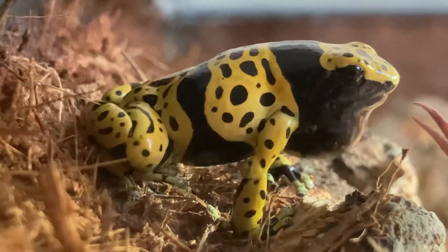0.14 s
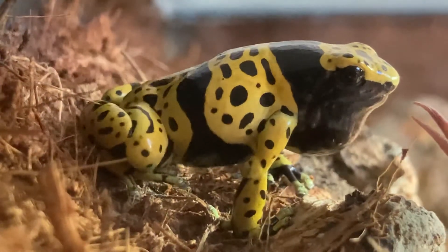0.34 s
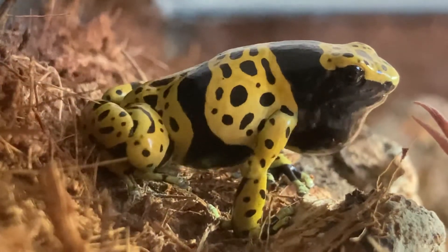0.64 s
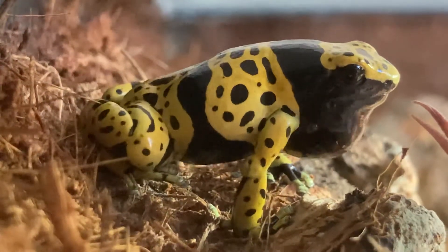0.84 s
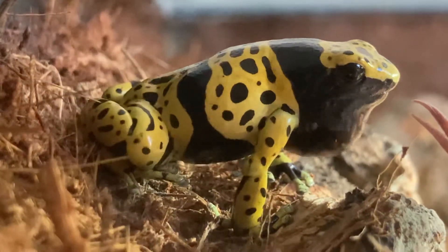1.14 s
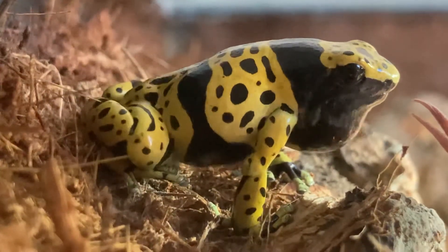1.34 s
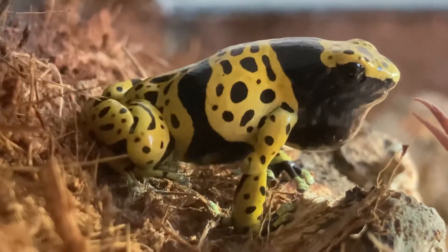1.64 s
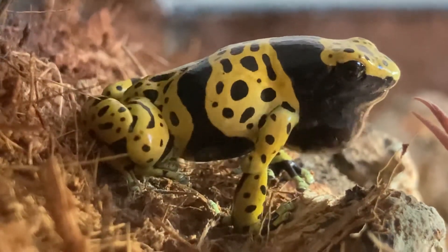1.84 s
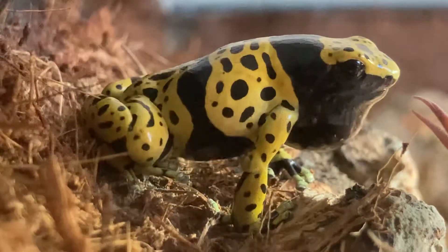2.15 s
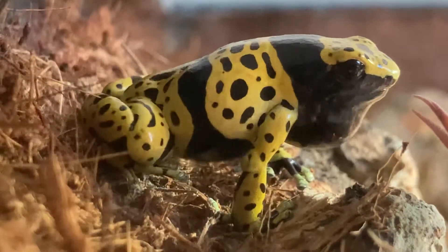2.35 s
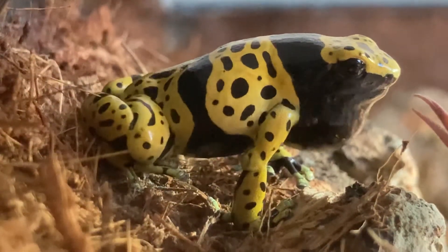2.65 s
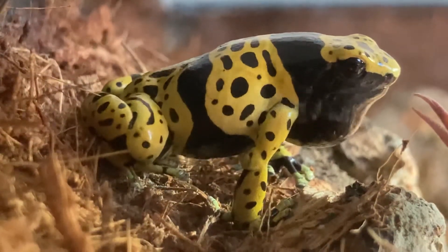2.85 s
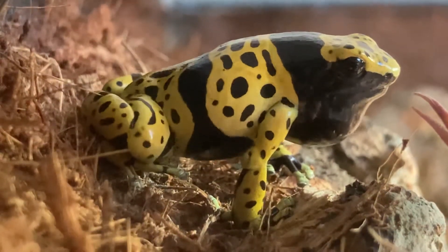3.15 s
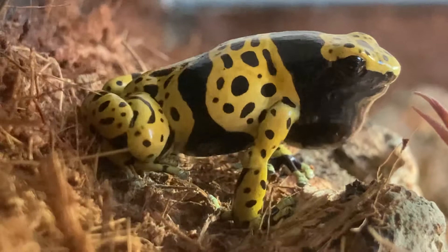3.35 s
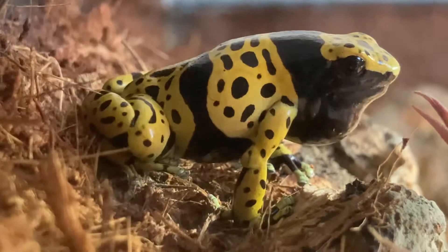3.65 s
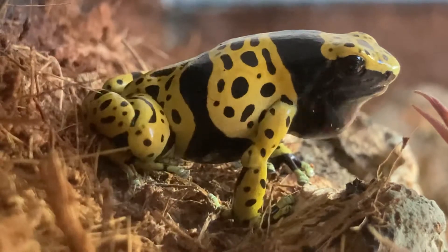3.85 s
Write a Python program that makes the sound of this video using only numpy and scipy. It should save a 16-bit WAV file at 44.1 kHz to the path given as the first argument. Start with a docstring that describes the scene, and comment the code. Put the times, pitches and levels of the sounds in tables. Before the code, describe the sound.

A small frog trills from the start, close and to the left, about thirteen high, raspy chirps a second, ringing lightly in a glass tank and the room. Two faint, dull knocks fall in the first 0.3 seconds, with a very brief dropout between them. The trill holds steady, falters near 3.4 seconds and gives a last note at 3.5. A faint rumble and soft bumps lie underneath.

```python
"""A small poison frog is trilling, about 13 notes a second, in a glass tank near the left microphone.
Each note is one quick upward sweep of a harmonic voice; it flashes out as its second harmonic
crosses the resonance of the throat. The glass reflects it, and the tank and the room ring on,
over a faint rumble and hiss, two knocks, soft bumps and a few ticks. Early on, the level dips briefly."""
import sys
import numpy as np
from scipy import signal
from scipy.fft import rfft, irfft
from scipy.io import wavfile
from scipy.ndimage import uniform_filter1d

SR = 44100
rng = np.random.default_rng(int(sys.argv[2]) if len(sys.argv) > 2 else 0)


def transcribe(u):
    """Save the signal u as a 16-bit wav file named by the first command-line argument.

    u: samples, shape (n,) or (channels, n), limited to [-1, 1]; the rate is SR.
    q: integer samples, one column per channel.
    """
    v = np.clip(np.atleast_2d(u).T, -1, 1)
    q = np.round(v * 32767).astype(np.int16)
    wavfile.write(sys.argv[1], SR, q)


N = 176400


def amp(db):
    """The decibel law: amplitude grows tenfold every 20 dB."""
    return 10 ** (np.asarray(db) / 20)


def unit_rms(x):
    """Normalisation to unit mean power."""
    return x / np.sqrt(np.mean(x ** 2) + 1e-20)


def spectrum_at(table, hz):
    """Interpolation on log frequency; the frequency column alone is first put in rising order."""
    f, *columns = np.transpose(table)
    return np.array([np.interp(np.log(hz + 1), np.log(np.sort(f) + 1), c) for c in columns])


def add(mix, start_s, sound):
    """Superposition: a sound adds to the mix from start_s on."""
    part = mix[max(round(start_s * SR), 0):][:len(sound)]
    part += sound[:len(part)]


def through(x, responses):
    """Linear filtering: convolution with one impulse response per channel."""
    return signal.fftconvolve(x[None], responses, axes=1)[:, :len(x)]


def band_noise(hz, octaves, count):
    """Spectral shaping: white noise under a Gaussian band on log frequency."""
    f = np.fft.rfftfreq(count, 1 / SR) + 1
    band = np.exp(-.5 * (np.log2(f / hz) / octaves) ** 2)
    return unit_rms(irfft(rfft(rng.standard_normal(count)) * band, count))


def note(db):
    """Periodic vibration of the vocal folds: a rising harmonic series, raspy until it settles."""
    peak_hz, peak_s, settle_s = 1377.7, .024, .018
    attack_s, hold_s, release_s = .023, .0071, .0046
    t = np.arange(0, attack_s + hold_s + release_s, 1 / SR)
    wander, air = rng.standard_normal((2, SR // 10))[:, :len(t)]
    unsettled = np.clip(1 - t / settle_s, 0, 1)
    jitter = (.0067 + .12 * unsettled) * unit_rms(uniform_filter1d(wander, size=40))
    octaves_per_s = 36 * (1 + .041 * rng.standard_normal())
    pitch_hz = peak_hz * 2 ** (octaves_per_s * (t - peak_s)) * (1 + jitter)
    phase = 2 * np.pi * np.cumsum(pitch_hz) / SR
    fundamental_db = -7.5 * (1 - np.minimum(t / peak_s, 1) ** 2)  # fills in as the note settles
    folds = amp(fundamental_db) * np.cos(phase) + sum(np.cos(k * phase) for k in range(2, 10))
    rasp = (amp(-14) + unsettled) * np.sqrt(10) * air
    attack = np.minimum(t / attack_s, 1) ** 1.325
    release = np.clip((t[-1] - t) / release_s, 0, 1)
    return amp(db) * attack * release * (folds + rasp)


def trill(run_up_s=.25):
    """A nearly periodic pulse train of notes, beginning run_up_s ahead of time zero."""
    # notes at their loudest moment: t/s, source level/dB
    notes = [(0.0713, -1), (0.173, -1.3), (0.2242, -1.8), (0.3018, -1.2), (0.3777, -1.2), (0.4546, -1.4),
             (0.5341, -1.5), (0.6107, -1.5), (0.687, -2.3), (0.7646, -1.5), (0.8424, -1.8), (0.9197, -1.8),
             (0.996, -1.6), (1.0739, -1.5), (1.1514, -1.5), (1.2306, -1.7), (1.3077, -1.5), (1.3856, -1.6),
             (1.4632, -1.5), (1.5421, -2), (1.6167, -2.1), (1.6931, -1.5), (1.7742, -2.9), (1.851, -1.4),
             (1.9302, -0.9), (2.0066, -1.9), (2.0836, -1.8), (2.1621, -1.6), (2.2416, -2), (2.3185, -1.9),
             (2.398, -2), (2.4761, -1.6), (2.5557, -1.8), (2.6355, -2.6), (2.7123, -2.2), (2.7907, -1.8),
             (2.8726, -2), (2.9522, -2.2), (3.032, -2), (3.112, -2), (3.191, -2), (3.2695, -2.1),
             (3.3493, -2.9), (3.4889, -2.34)]
    # notes before time zero, whose ringing carries over: t/s
    earlier_notes = [-0.2, -0.07, -0.016]
    lead_s = .024 + .0009  # rise to the peak, plus the lag of the resonance
    voice = np.zeros(N + round(run_up_s * SR))
    for s, db in [(s, notes[0][1]) for s in earlier_notes] + list(notes):
        add(voice, run_up_s + s - lead_s, note(db))
    add(voice, run_up_s + 3.408, note(db=-1)[:round(.0175 * SR)])  # breaks off before its peak
    return voice


def throat_and_glass(voice, size=4096):
    """Source and filter: resonances colour the voice, and reflections interfere with the direct sound."""
    # throat and tank response at each microphone: f/Hz, left level/dB, right level/dB
    resonances = [(700, -60.5, -66), (1130, -56, -60.5), (1360, -60, -65), (1453, -52, -37.5),
                  (1436, -43, -41), (1652, -30.5, -47.5), (1863, -28.5, -45), (1954, -46.5, -52),
                  (2222, -24.5, -39), (2496, -37.5, -43.5), (2568, -22.5, -41), (2742, -13, -40),
                  (2876.6, -17.5, -33.5), (2946, -43.5, -40.5), (3080, -34.5, -49), (3650, -37.5, -65),
                  (4084, -65, -60), (4204, -40.5, -55.5), (4385, -70.5, -66.5), (4590, -55, -55.5),
                  (5230, -71.5, -77), (5614, -63, -53.5), (6400, -83.5, -75), (7000, -83.5, -72),
                  (6590, -63, -62), (7200, -66, -67.5), (8210, -71, -71), (8560, -105, -105)]
    # reflections off the glass: delay t/s, left level/dB, right level/dB
    walls = [(.0034, -29.5, -7), (.0066, -38.5, -5), (.0098, -29.5, -17), (0.0148, -27.5, -31)]
    log_gain = np.log(amp(spectrum_at(resonances, abs(np.fft.fftfreq(size, 1 / SR)))))
    minimum_phase = np.exp(signal.hilbert(log_gain).conj())
    direct = np.fft.ifft(minimum_phase).real[:, :size // 2]
    hz = np.fft.rfftfreq(size, 1 / SR)
    comb = 1 + sum(amp([[left], [right]]) * np.exp(-2j * np.pi * hz * s) for s, left, right in walls)
    return through(voice, irfft(rfft(direct, size) * comb))


def diffuse_tail(x, bands, build_s, size=512):
    """Reverberation: dense reflections act as noise that builds up, then decays exponentially by band."""
    hz, t, noise = signal.stft(rng.standard_normal((2, SR)), SR, nperseg=size)
    left, right, t60 = spectrum_at(bands, hz)[:, :, None]
    unit_energy = np.sqrt(2 * np.log(1000) / (t60 * SR))
    fade = amp(np.array([left, right]) - 60 * t / t60) * unit_energy
    tail = signal.istft(noise * fade, SR, nperseg=size)[1]
    build = 1 - np.exp(-(np.arange(tail.shape[1]) / SR / build_s) ** 2)
    return through(x, tail * build)


def tank_modes(voice):
    """Normal modes: each note excites narrow resonances of the enclosure, which ring as damped sines."""
    # modes: f/Hz, left level at resonance/dB, decay t60/s
    modes = [(1580, -41.5, 0.47), (2260, -43.5, .5), (2770, -28.5, 0.36)]
    t = np.arange(SR) / SR
    response = np.zeros(SR)
    for hz, db, t60 in modes:
        unit_gain = 2 * np.log(1000) / (t60 * SR)
        response += amp(db - 60 * t / t60) * unit_gain * np.sin(2 * np.pi * hz * t)
    return through(voice, response * amp([[0], [-5.5]]))  # weaker on the right


def tank_wash(voice):
    """Reverberation in a small enclosure: a short wash inside the tank."""
    # tank reverberation: f/Hz, left level/dB, right level/dB, decay t60/s
    bands = [(800, -74, -75.5, 0.048), (1190, -57.5, -62.5, 0.026), (1610, -46, -52.5, 0.15),
             (2630, -48, -36, 0.036), (3700, -58, -45, 0.076), (5500, -59.5, -71.5, 0.05),
             (8100, -81.5, -87, 0.1), (8700, -105, -105, .05)]
    return diffuse_tail(voice, bands, build_s=.0015)


def room_ring(voice):
    """Reverberation in a larger enclosure: the room builds more slowly and rings longer."""
    # room reverberation: f/Hz, left level/dB, right level/dB, decay t60/s
    bands = [(756, -62, -69.5, .6), (1267, -57.5, -58, 0.36), (1612, -38, -39.5, 0.82),
             (1865, -40, -51, 0.51), (2200, -35.5, -38, 0.53), (2615, -38.5, -40, 1),
             (2760, -28, -33.5, 0.87), (3040, -49, -47.5, 0.35), (3080, -45.5, -49, .55),
             (3750, -62, -61.5, 0.48), (5500, -69, -73, 0.32), (8100, -80, -77.5, 0.49),
             (8700, -110, -110, .3)]
    return diffuse_tail(voice, bands, build_s=.015)


def rumble(size=2048):
    """Partial coherence: room noise swells in patches, alike in both channels at low frequencies."""
    # spectral density of the rumble: f/Hz, relative level/dB
    density = [(15, -18), (35, -1), (62, 0.2), (120, -9), (250, -15), (500, -20), (900, -26), (1900, -31),
               (2900, -25), (3700, -45), (8100, -48), (8900, -58)]
    # likeness of left and right: f/Hz, coherence (0 to 1)
    likeness = [(30, 1), (90, 0.99), (180, .9), (350, 0.85), (700, 0.1), (3000, 0.12)]
    patch_db, swell_db, hop = 2.5, .87, size // 4
    frames, hz = N // hop + 5, np.fft.rfftfreq(size, 1 / SR)
    left_re, left_im, other_re, other_im, patches = rng.standard_normal((frames, len(hz), 5)).T
    patches = uniform_filter1d(patches, size=8, axis=0)  # smooth over frequency, then over time
    patches = unit_rms(uniform_filter1d(patches, size=5, axis=1))
    swell = unit_rms(uniform_filter1d(rng.standard_normal(frames), size=6))
    coherence = np.clip(spectrum_at(likeness, hz).T, -1, 1)
    left = left_re + 1j * left_im
    right = coherence * left + np.sqrt(1 - coherence ** 2) * (other_re + 1j * other_im)
    gain = amp(spectrum_at(density, hz).T + patch_db * patches + swell_db * swell)
    noise = signal.istft(np.array([left, right]) * gain, nperseg=size, noverlap=size - hop)[1]
    return amp(-64) * unit_rms(noise[:, :N])


def hiss(hz=11300, width_hz=1200, db=-92):
    """Incoherent noise: a thin high band, independent in each channel."""
    octaves = width_hz / hz / np.log(2)
    return amp(db) * np.array([band_noise(hz, octaves, N) for _ in range(2)])


def knocks():
    """Damped oscillation: gritty thuds whose pitch drops as they die."""
    # knocks: onset t/s, level/dB
    events = [(0.02, -46), (0.294, -44)]
    top_hz, end_hz = 772, 72.5
    drop_s, rise_s, fade_s = .007, .0099, .013
    out, t = np.zeros(N), np.arange(SR // 4) / SR
    for s, db in events:
        hz = end_hz + (top_hz - end_hz) * np.exp(-t / drop_s)
        tone = np.sin(2 * np.pi * np.cumsum(hz) / SR)
        grit = .63 * band_noise(hz=150, octaves=1, count=len(t))
        envelope = np.minimum(t / rise_s, 1) * np.exp(-t / fade_s)
        add(out, s, amp(db) * envelope * (tone + grit))
    return out


def bumps():
    """Amplitude modulation: low noise under a rounded envelope is heard as a soft, dull bump."""
    # bumps: t/s (just past the peak), level/dB, centre f/Hz, length t/s
    events = [(.2, -61.5, 170, .03), (0.529, -58, 140, 0.037), (0.593, -56.5, 170, 0.088),
              (0.777, -55.5, 60, 0.11), (0.811, -59, 150, 0.051), (1.087, -55.5, 85, 0.036),
              (1.436, -61, 140, 0.043), (1.524, -58.5, 100, 0.08), (1.69, -64.5, 110, .04),
              (2.369, -55, 56, .11), (2.824, -70, 95, 0.055), (2.997, -58.5, 90, .05),
              (3.124, -62.5, 160, 0.063), (3.322, -60, 68, 0.051), (3.463, -64, 150, .03)]
    out, t = np.zeros(N), np.arange(SR // 4) / SR
    for s, db, hz, length_s in events:
        rise_s = .27 * length_s
        envelope = t / rise_s * np.exp(1 - t / rise_s)
        add(out, s - 1.6 * rise_s, amp(db) * envelope * band_noise(hz, octaves=.59, count=len(t)))
    return out


def ticks():
    """Exponential decay: high noise that dies within milliseconds is heard as a tiny tick."""
    # ticks: onset t/s, level/dB, centre f/Hz, width/octaves, decay t/s
    events = [(1.997, -70.5, 11500, .13, .003), (2.655, -79, 11500, .15, .003),
              (3.423, -58, 4500, 0.91, 0.00082)]
    out, t = np.zeros(N), np.arange(SR // 4) / SR
    for s, db, hz, octaves, decay_s in events:
        add(out, s, amp(db) * np.exp(-t / decay_s) * band_noise(hz, octaves, len(t)))
    return out


def scene():
    """Superposition of the frog, its tank, the room and the faint background sounds."""
    voice = trill()
    frog = throat_and_glass(voice) + tank_modes(voice) + tank_wash(voice) + room_ring(voice)
    return frog[:, -N:] + rumble() + hiss() + bumps() + knocks() + ticks()


def record(dry):
    """Gating and band limiting: one short, abrupt dip in level, then a low-pass filter."""
    dip_start_s, dip_end_s, dip_db, cutoff_hz = .1175, .1395, -26.5, 14500
    t = np.arange(N) / SR
    gate = np.where((t > dip_start_s) & (t < dip_end_s), amp(dip_db), 1.)
    low_pass = signal.firwin(511, cutoff_hz, window=("kaiser", 9), fs=SR)
    return signal.oaconvolve(dry * gate, low_pass[None], "same")


dry = scene()
out = record(dry)
transcribe(out)
```